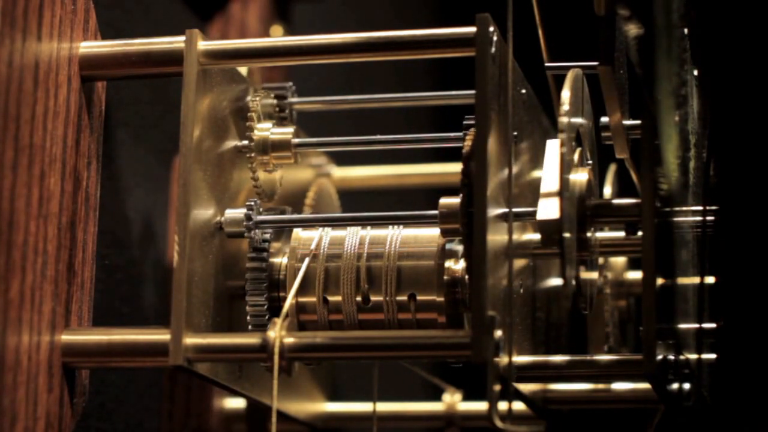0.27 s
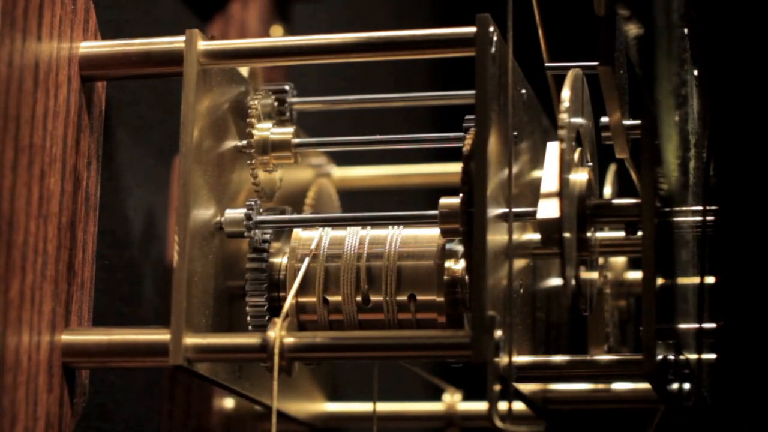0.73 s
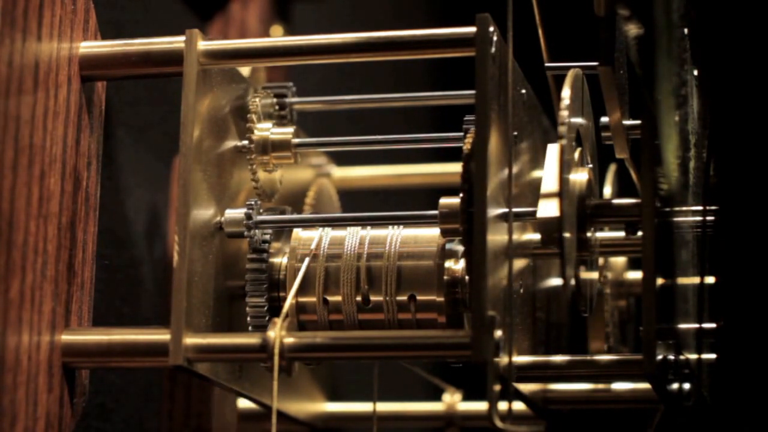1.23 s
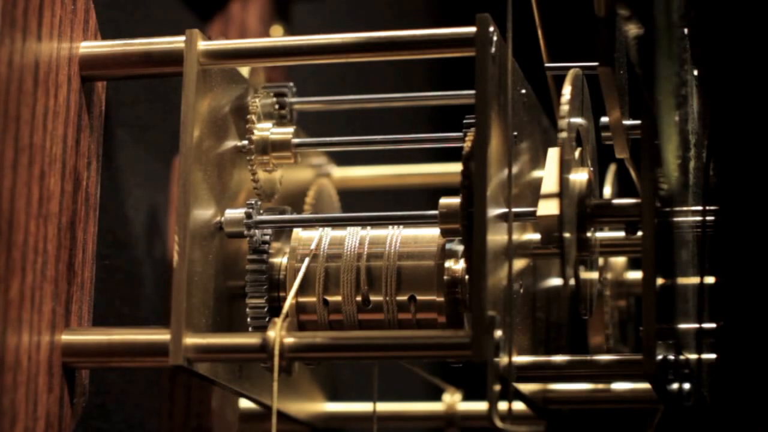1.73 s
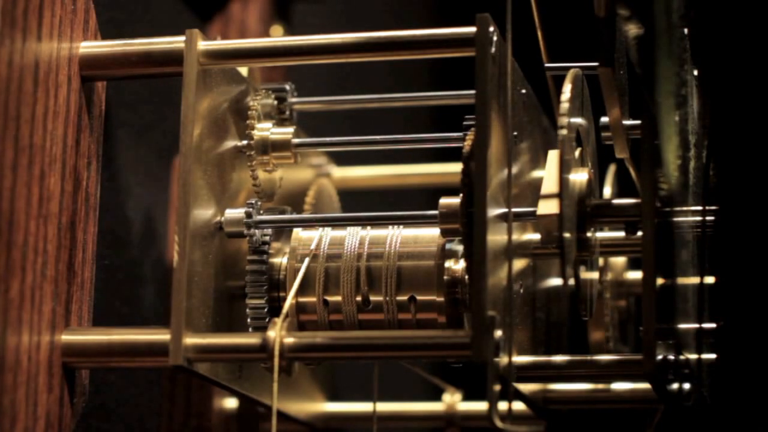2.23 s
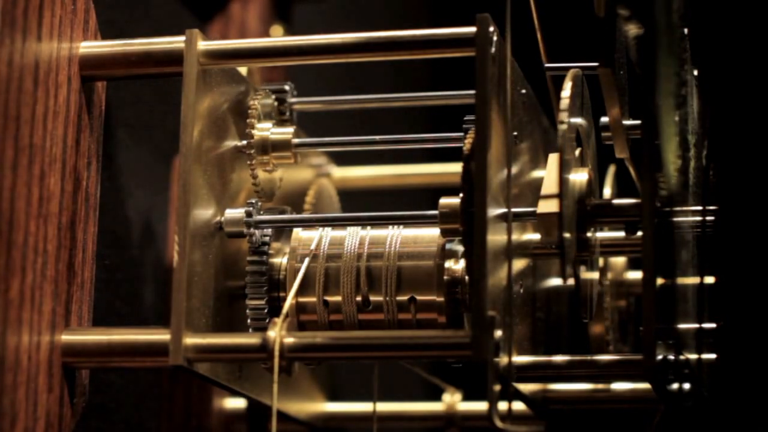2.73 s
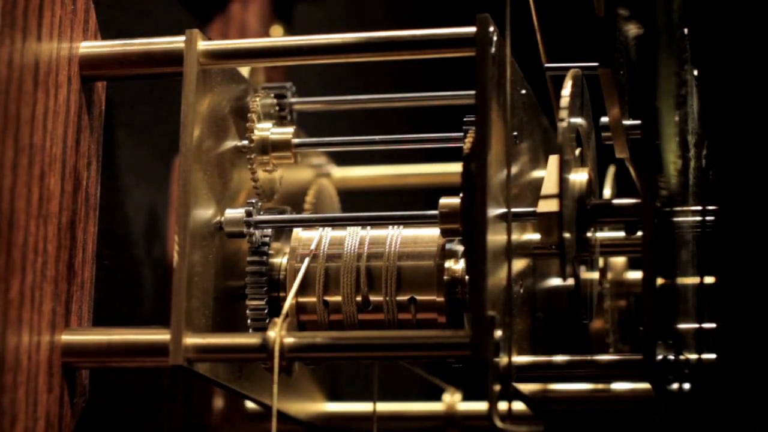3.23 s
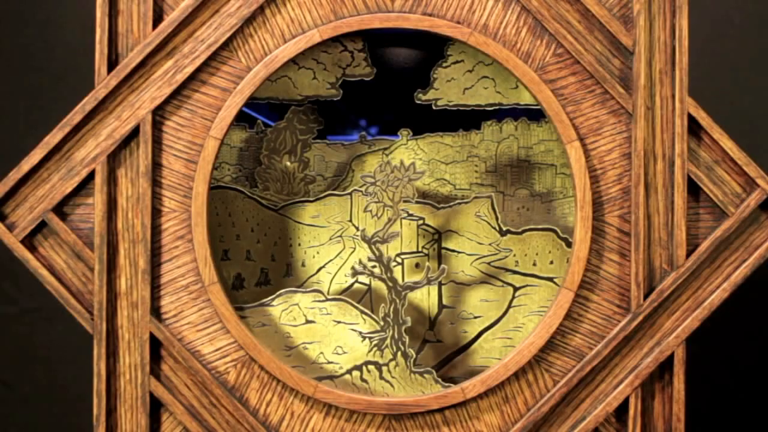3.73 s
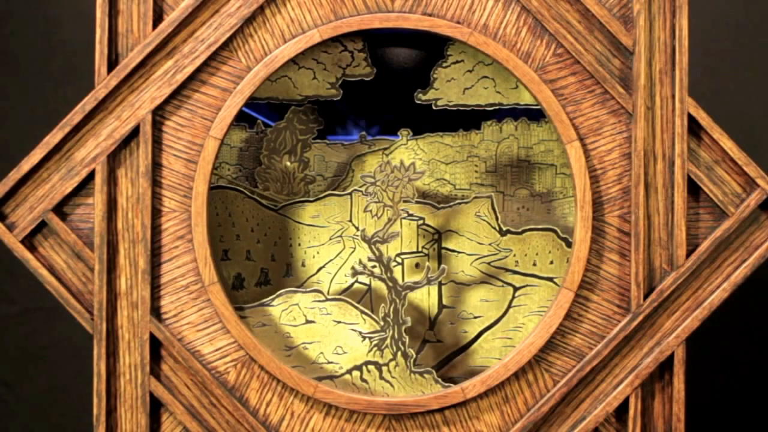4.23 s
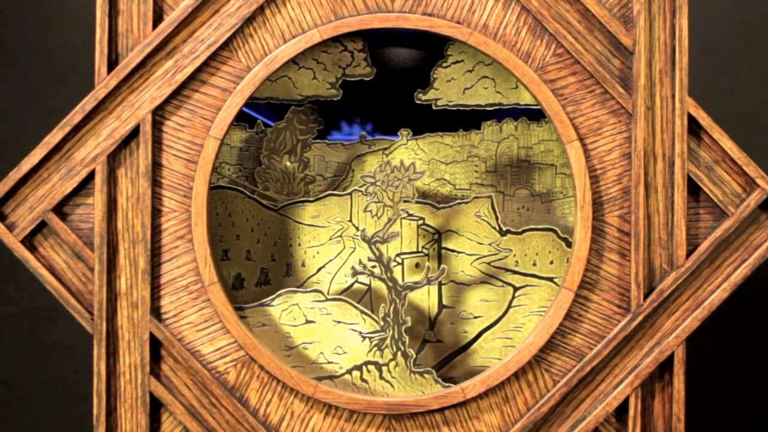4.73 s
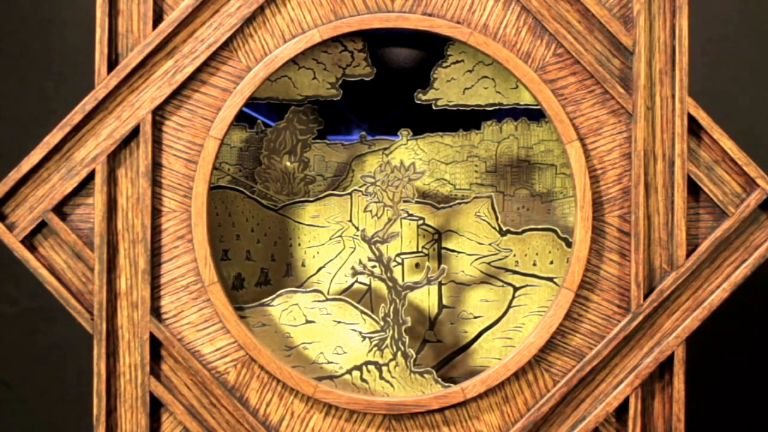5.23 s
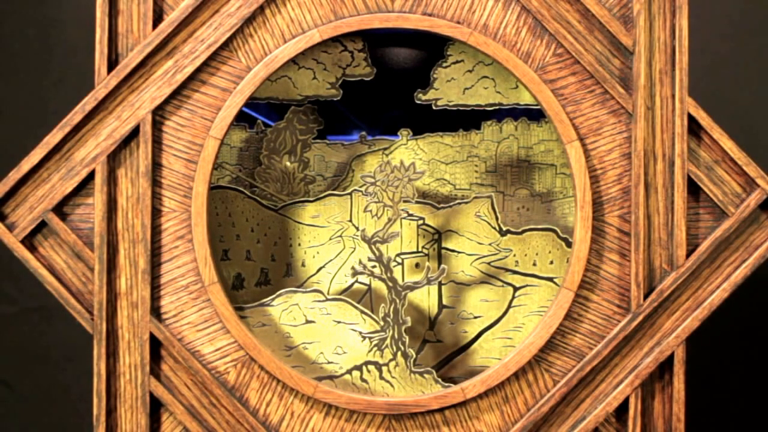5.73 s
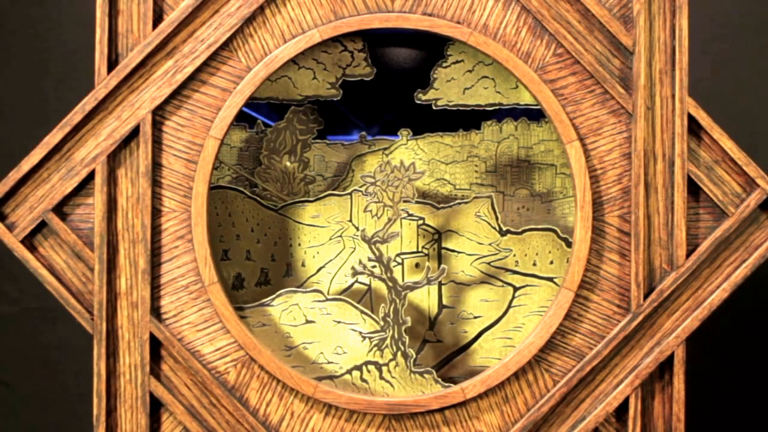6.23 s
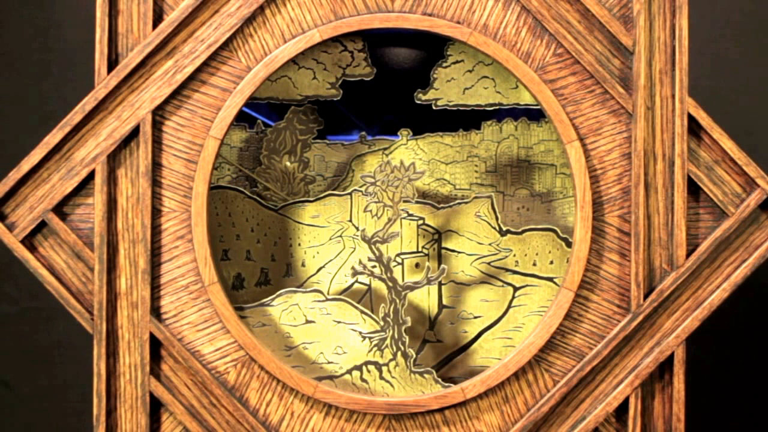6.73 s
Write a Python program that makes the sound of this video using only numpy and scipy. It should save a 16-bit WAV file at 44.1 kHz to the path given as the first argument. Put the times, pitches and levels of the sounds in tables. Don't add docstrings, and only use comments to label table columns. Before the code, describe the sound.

A mechanical clock movement ticks steadily for about 7 seconds, heard very close in a quiet indoor room. The dying end of a tock is present at 0, then a tick lands near 0.27 and a tock near 0.56, alternating about every 0.3 seconds to the end. Each beat has a faint slip just before a crisp metal impact and several tiny bounces within hundredths of a second. Ticks are bright and sharp; tocks chatter slightly longer, with a soft rebound after. Thin brass rings and a small woody knock fade quickly into short room echo. Faint gear rattles occur around 2.9 and 4.1, with weak thin clicks near 3.8, 4.4, 5.0, 5.6 and 6.2. Quiet hiss and a low building rumble continue unchanged underneath. The pace stays regular, with small differences in strength and colour between beats.

```python
import sys
import numpy as np
from scipy import signal
from scipy.fft import rfft, irfft
from scipy.io import wavfile
from scipy.ndimage import uniform_filter1d

SR = 44100
rng = np.random.default_rng(int(sys.argv[2]) if len(sys.argv) > 2 else 0)


def magnitude_from_level(level_db):
    exponent = np.asarray(level_db, float) / 20
    return 10 ** exponent


def put_to_file(sound):
    columns = np.atleast_2d(sound).T
    safe = np.clip(columns, -1, 1)
    whole_steps = np.round(safe * 32767)
    wavfile.write(sys.argv[1], SR, whole_steps.astype(np.int16))


N = 308239
SPAN, LEAD = 12288, 2048
HZ = np.fft.rfftfreq(2 * SPAN, 1 / SR)
HARD_DB, DROP_S = -29.5, 0.036

# (frequency [Hz], level [dB per Hz])
FLOOR = [(12, -48), (28, -3.5), (45, 7.5), (65, -3.5), (120, -7.5), (250, -15), (380, -14), (800, -21.5),
         (2200, -28), (5800, -30), (10000, -31.5), (15200, -35.5), (16500, -50.5)]
# (frequency [Hz], time to fall 60 dB [s])
ROOM = [(200, 0.69), (1000, 0.51), (4000, 0.34), (10000, 0.22), (16000, 0.15)]

# (drop time [s], strength [dB], unlocking ahead [s], bounces [dB], arbor [dB])
TICKS = [(0.2704, -14.5, 0.0053, -1.5, -1.5), (0.8686, -14.5, 0.0033, 0, 0.5),
         (1.4746, -16.5, 0.0054, 1.5, -1.5), (2.0773, -15, 0.0016, -0.1, 1.5),
         (2.6809, -15, 0.0016, -1, 0.5), (3.2885, -15.5, 0.0015, 0.7, 5), (3.8919, -13.5, .0015, -1.9, 5.5),
         (4.4963, -18.5, 0.0015, 4.5, 4.5), (5.097, -13.5, 0.0015, -2, 5.5), (5.7058, -15, 0.0037, -2, 7.5),
         (6.3196, -17.5, 0.008, 0.8, 7.5), (6.9361, -16, 0.004, -2, 4.5)]
# (drop time [s], strength [dB], unlocking ahead [s], rebound after [s], rod ring [dB])
TOCKS = [(0.5632, -14.5, 0.0072, 0.042, 4.5), (1.1686, -15.5, 0.0088, 0.035, 0.5),
         (1.7699, -14, 0.0056, 0.036, -2), (2.3735, -14, 0.0064, .034, -2),
         (2.9823, -13.5, 0.0074, 0.036, 7), (3.5836, -15.5, .0052, 0.04, -1),
         (4.192, -15.5, 0.0063, 0.04, 5.5), (4.79, -16.5, 0.0086, .040, -10),
         (5.387, -16, 0.0069, .036, -14), (5.9953, -14, 0.0095, 0.032, 4),
         (6.6095, -13.5, 0.00037, 0.032, 0)]
# (time [s], level [dB])
EARLIER = [(-.036, -14), (-.03, -13), (-.022, -26), (.002, -60)]
# (time from unlocking [s], level against the beat [dB])
UNLOCK = [
    (-.001, -27),
    (0, -24.5),
]
# (time after the drop [s], level [dB])
TICK_BOUNCES = [(.0046, -0.5), (.0085, -8), (0.0107, -6.5), (0.019, -16)]
# (time after the drop [s], level [dB])
TOCK_CHATTER = [(0, -2.5), (.0028, -2.5), (.0058, 0.8), (.0085, 0), (0.014, -4.5), (0.025, -14)]
# (time from the rebound [s], level [dB])
REBOUND = [
    (-.009, -25.5),
    (0, -17.5),
    (.004, -23.5),
    (.014, -25.5),
]

# (frequency [Hz], column of the tints below)
TINT_SPANS = [(1000, 0), (2500, 1), (5200, 1), (5700, 2), (7000, 2), (9000, 3), (11000, 3), (12200, 4),
              (14500, 5)]
# (case, pillars, wheel, plates, arbor, teeth [dB])
TICK_TINT = (0.83, 2.9, -5.3, -3.3, .1, -2.5)
TOCK_TINT = (-2.2, -0.27, -1.2, -1.04, 1, 3.5)
# (case, pillars, wheel, plates, arbor, teeth [dB per dB])
SEATING = (-0.36, -.05, 0.22, -0.62, 0.97, -.4)
# (case, pillars, wheel, plates, arbor, teeth [dB])
TOOTH_DB = np.array([.7, 1.4, 1.3, 1.3, 1.5, 1.5])

# (frequency [Hz], level [dB per Hz])
TICK_COLOUR = [(100, -14), (700, -17), (1900, -23.5), (4500, -15.5), (6500, -7.5), (7800, -4), (10500, 5),
               (13500, -21.5), (15500, -4.5)]
TOCK_COLOUR = [(100, -39), (700, -19.5), (1900, -16.5), (3000, -5.5), (5200, -19), (6200, 4), (7600, -5),
               (10500, -10), (15500, -11.5)]
SOFT_COLOUR = [(150, -3.5), (500, -14), (1800, -9.5), (3100, -5), (4400, -4.5), (6000, 4), (7600, -3.5),
               (10500, -7), (15500, -21)]
CASE_COLOUR = [(60, -46), (150, -21), (250, -5.5), (400, 1.5), (800, 1), (1300, -2), (2200, -19.5),
               (5000, -51.5)]

# (frequency [Hz], width [Hz], level [dB])
PALLET = [(2530, 170, -13), (3100, 400, -17), (4500, 500, -16)]
# (frequency [Hz], width [Hz], level [dB])
TICK_WHEEL = [(755, 257, -15.0), (5864, 270, -1.0), (6630, 157, 4.5), (7015, 230, -5.0), (7930, 130, -5.0),
              (8130, 140, -1.5), (9230, 190, 1.5), (10020, 260, -58.5), (9870, 440, -2.5),
              (11010, 320, 0.5), (12370, 280, -5.0), (14160, 120, 1)] + PALLET
TOCK_WHEEL = [(2552, 36, -8.5), (4370, 150, -12), (5860, 60, 2), (5775, 38, 0), (5960, 44, -18),
              (6300, 33, -16.5), (6590, 690, -13), (8300, 15, -10), (9170, 370, -5), (10620, 100, -1.5),
              (10910, 220, -8.5), (12200, 110, -6), (13600, 67, -18.5), (15600, 98, -31.5)]
# (frequency [Hz], width [Hz], level [dB])
CRUTCH = [(660, 270, -2), (3540, 140, 4), (11800, 550, -4)]

FRAME_HZ = [237, 388, 1128, 1623, 1973, 2309, 2447, 2850, 3499, 3580, 3973, 4156, 5093, 5359, 5682, 6029,
            6473, 7074, 7251, 7795, 8185, 9795, 10258, 10640, 10777, 10925, 11087, 11940, 12061, 14021]
# (time to fall 60 dB [s], level from a tick [dB], level from a tock [dB])
FRAME = [(0.38, -57, -48), (0.53, -61.5, -50.5), (0.44, -60, -63.5), (0.32, -78, -57), (0.34, -65.5, -63),
         (0.27, -64, -61), (0.79, -72, -67.5), (0.51, -66.5, -65), (0.44, -91, -58.5), (0.12, -77, -66),
         (0.22, -54, -85), (0.28, -56, -52), (0.41, -59.5, -60.5), (0.37, -67.5, -65), (0.41, -53.5, -51.5),
         (0.53, -61.5, -63.5), (0.095, -40, -53.5), (0.19, -50.5, -67), (0.3, -69, -63), (0.33, -68, -61),
         (0.46, -65.5, -64.5), (0.51, -69.5, -65.5), (0.33, -65.5, -71.5), (0.51, -65, -62),
         (0.28, -74.5, -69.5), (0.6, -67.5, -67), (0.36, -72.5, -81.5), (0.46, -66, -70),
         (0.43, -56, -71.5), (0.52, -70, -74)]
CLEAREST = [0, 1, 2, 14, 22, 28]
# (case low, case high, board, rod, plate, pin [dB])
TICK_RING = (0.5, 4.5, 1, -5, 8.5, -7.8)
TOCK_RING = (-0.5, -1, 0.3, .1, 5.7, -1.5)

# (time [s], level [dB])
RATTLES = [
    [(2.868, -42), (2.8805, -46), (2.891, -32)],
    [(4.082, -45.5), (4.089, -56), (4.101, -41)],
    [(2.568, -56), (2.609, -56)],
    [(3.969, -56)],
    [(4.324, -51)],
    [(3.226, -57)],
    [(3.852, -55)],
    [(6.28, -62)],
]
# (frequency [Hz], width [Hz], level [dB])
GEARS = [(875, 170, -8.5), (2680, 250, -3.5), (4700, 710, -12.5), (5820, 190, 2.5), (7940, 460, -13),
         (9100, 430, -11), (13000, 3300, -24.5)]
# (time [s], peak level [dB])
CLICKS = [(3.7835, -39.5), (4.391, -48.5), (4.9932, -42), (5.5865, -35.5), (6.188, -43)]
# (frequency [Hz], width [Hz], level [dB])
ARBOR = [(3300, 60, -12), (6700, 560, 1.5), (10430, 340, 3.5), (14300, 220, 2)]

TICK = dict(colour=TICK_COLOUR, wheel=TICK_WHEEL, column=1, wheel_db=9.76, case_db=-27, pin_db=-11)
TOCK = dict(colour=TOCK_COLOUR, wheel=TOCK_WHEEL, column=2, wheel_db=10.94, case_db=-23, pin_db=-34)


def unit(x):
    return x / np.sqrt(np.mean(x ** 2) + 1e-20)


def along(points, hz):
    f, v = np.transpose(points)
    return np.interp(np.log(hz + 1), np.log(f + 1), v)


def filtered(x, response):
    return irfft(rfft(x, 2 * SPAN) * response)[:SPAN]


def coloured(gain):
    return unit(filtered(rng.standard_normal(SPAN), gain))


def resonances(modes, scatter_db):
    hz, width, db = np.transpose(modes)[:, :, None]
    sign = (-1) ** np.arange(len(db))[:, None]
    gain = sign * magnitude_from_level(db + scatter_db * rng.standard_normal(db.shape))
    return np.sum(gain * 1j * HZ * width / (hz ** 2 - HZ ** 2 + 1j * HZ * width), axis=0)


def chatter(contacts, start, t60, rise=0.00076):
    s, db = np.reshape(contacts, (-1, 2)).T[:, :, None]
    age = np.maximum(np.arange(SPAN // 2) / SR + start - s, 0)
    power = np.sum(magnitude_from_level(2 * db - 120 * age / t60) * (1 - np.exp(-age / rise)), axis=0)
    return np.pad(np.sqrt(power), (0, SPAN // 2))


def taps(contacts, start, t60, blow_db):
    force = rng.standard_normal(SPAN) * chatter(contacts, start, t60)
    for s, db in contacts:
        force[round((s - start) * SR)] += magnitude_from_level(db + blow_db)
    return force


def room(x):
    hz, t, z = signal.stft(rng.standard_normal(SPAN), SR, nperseg=256)
    decay = magnitude_from_level(-60 * t / along(ROOM, hz)[:, None])
    tail = signal.istft(z * decay, SR, nperseg=256)[1]
    return filtered(x, rfft(tail / np.linalg.norm(tail), 2 * SPAN))


def add(out, start, x):
    at = round(start * SR) + LEAD
    out[at:at + len(x)] += x


def background():
    hz = np.fft.rfftfreq(N, 1 / SR)
    spectrum = rfft(rng.standard_normal(N)) * magnitude_from_level(along(FLOOR, hz))
    return magnitude_from_level(-58) * unit(irfft(spectrum, N))


def unlocking(s, db, ahead):
    return [(s - ahead + t, db + d) for t, d in UNLOCK]


def tick_contacts(s, db, ahead, bounce_db):
    bounces = [(s + t, db + bounce_db + d) for t, d in TICK_BOUNCES]
    return unlocking(s, db, ahead) + [(s, db)] + bounces


def tock_contacts(s, db, ahead, rebound):
    landing = [(s + t, db + d) for t, d in TOCK_CHATTER]
    return unlocking(s, db, ahead) + landing + [(s + rebound + t, db + d) for t, d in REBOUND]


def tooth(contacts, tint_db, ring_db):
    contacts = np.array(contacts)
    uneven = rng.standard_normal(contacts.shape) * (0.0005, 1.3)
    uneven[:len(UNLOCK) + 1] = 0
    tint_db = tint_db + TOOTH_DB * rng.standard_normal(6)
    ring_db = ring_db + 2 * rng.standard_normal(6)
    return [tuple(c) for c in contacts + uneven], tint_db, ring_db


def plate_chatter(hard, soft, start, colour, tint, grain):
    loud = coloured(tint * magnitude_from_level(along(colour, HZ))) * grain * chatter(hard, start, t60=0.034, rise=0.0006)
    light = coloured(magnitude_from_level(along(SOFT_COLOUR, HZ))) * grain * chatter(soft, start, t60=0.047)
    return magnitude_from_level(-8) * loud + magnitude_from_level(-5) * light


def wheel_ring(hard, start, wheel, tint, grain):
    force = rng.standard_normal(SPAN) * grain * chatter(hard, start, t60=0.02)
    return filtered(force, tint * resonances(wheel, scatter_db=-1.0))


def pin(delay):
    t = np.maximum(np.arange(SPAN) / SR - delay, 0)
    free, seated = 12150, 12750
    hz = free + (seated - free) * np.clip(t / 0.024, 0, 1) ** 2
    hz += 900 * uniform_filter1d(rng.standard_normal(SPAN), size=60)
    return np.sin(2 * np.pi * np.cumsum(hz) / SR)


def crutch_ring(late, start):
    return filtered(taps(late, start, t60=0.012, blow_db=14), resonances(CRUTCH, scatter_db=2.5))


def case_thump(contacts, start):
    thump = magnitude_from_level(3.0) * chatter(contacts, start, t60=0.03, rise=0.005)
    thump += magnitude_from_level(-6.0) * chatter(contacts, start, t60=0.22, rise=0.042)
    return coloured(magnitude_from_level(along(CASE_COLOUR, HZ))) * thump


def frame(delay, column, ring_db, level_db):
    hz = np.array(FRAME_HZ, np.float32)[:, None]
    t60, db = np.array(FRAME)[:, [0, column], None].transpose(1, 0, 2)
    strike_db = 2.5 * rng.standard_normal(db.shape)
    strike_db[CLEAREST, 0] = ring_db
    t = np.maximum(np.arange(SPAN) / SR - delay, 0)
    fade = 1 - np.linspace(0, 1, SPAN) ** 8
    knot_s = np.linspace(0, SPAN / SR, 28)
    flutter_db = 2.2 * rng.standard_normal((len(hz), len(knot_s)))
    knot_gains = magnitude_from_level(db + strike_db + flutter_db - 60 * knot_s / t60)
    gains = np.array([np.interp(t, knot_s, g) for g in knot_gains], np.float32)
    turns = (hz * t + rng.random(hz.shape)) % 1
    modes = gains * np.sin((2 * np.pi * turns).astype(np.float32))
    return magnitude_from_level(level_db) * modes.sum(axis=0) * (1 - np.exp(-t / 0.01)) * fade


def beat(contacts, pallet, tint_db, ring_db):
    start = contacts[0][0]
    hard = [c for c in contacts if c[1] > HARD_DB and c[0] < start + DROP_S]
    soft = [c for c in contacts if c not in hard]
    late = [c for c in soft if c[0] > start + DROP_S]
    delay = hard[0][0] - start
    tint = magnitude_from_level(along([(hz, tint_db[k]) for hz, k in TINT_SPANS], HZ))
    grain = unit(magnitude_from_level(1.5 * unit(uniform_filter1d(rng.standard_normal(SPAN), size=16))))
    plates = plate_chatter(hard, soft, start, pallet["colour"], tint, grain)
    metal = magnitude_from_level(pallet["wheel_db"]) * wheel_ring(hard, start, pallet["wheel"], tint, grain)
    metal += magnitude_from_level(pallet["pin_db"] + 1.45 * tint_db[4]) * pin(delay) * chatter(hard, start, t60=0.026)
    metal += magnitude_from_level(7) * crutch_ring(late, start)
    case = magnitude_from_level(pallet["case_db"] + tint_db[0]) * case_thump(contacts, start)
    wet = magnitude_from_level(-13.5) * room(plates + magnitude_from_level(-8.0) * metal + case)
    return start, plates + metal + case + wet + frame(delay, pallet["column"], ring_db, level_db=1.0)


def escapement(out):
    add(out, *beat(EARLIER, TOCK, np.zeros(6), [-21, -6, -3, -6, -3, -1]))
    for *row, arbor_db in TICKS:
        contacts, tint_db, ring_db = tooth(tick_contacts(*row), TICK_TINT, TICK_RING)
        tint_db += arbor_db * np.array(SEATING)
        ring_db[5] += 1.1 * arbor_db
        add(out, *beat(contacts, TICK, tint_db, ring_db))
    for *row, rod_db in TOCKS:
        contacts, tint_db, ring_db = tooth(tock_contacts(*row), TOCK_TINT, TOCK_RING)
        ring_db[3] = rod_db
        add(out, *beat(contacts, TOCK, tint_db, ring_db))


def gear_rattles(out):
    for contacts in RATTLES:
        start = contacts[0][0]
        last, db = contacts[-1]
        force = taps(contacts, start, t60=0.046, blow_db=17)
        knock = filtered(force, magnitude_from_level(-28.5) + magnitude_from_level(6) * resonances(GEARS, scatter_db=1.5))
        ring = frame(last - start, 2, [2, -27, -3, 1, -2, 1], level_db=db + 8)
        add(out, start, knock + magnitude_from_level(-11) * room(knock) + ring)


def arbor_clicks(out):
    for s, db in CLICKS:
        force = taps([(s, db)], s, t60=0.019, blow_db=8)
        click = filtered(force, magnitude_from_level(-12) + resonances(ARBOR, scatter_db=-4.0))
        add(out, s, click + magnitude_from_level(-19) * room(click))


def scene():
    out = np.zeros(N + SPAN + 2 * LEAD)
    escapement(out)
    gear_rattles(out)
    arbor_clicks(out)
    return (out[LEAD:LEAD + N] + background())[None]


def band_limit(x):
    return signal.sosfilt(signal.butter(12, 16990, fs=SR, output="sos"), x)


def record(dry):
    hz = np.fft.rfftfreq(N, 1 / SR)
    edge = magnitude_from_level(along([(15550, 0), (15800, -6), (16050, -25), (16850, -38), (17100, -90)], hz))
    mix = irfft(rfft(dry) * edge, N)
    return band_limit(mix)


dry = scene()
out = record(dry)
put_to_file(out)
```